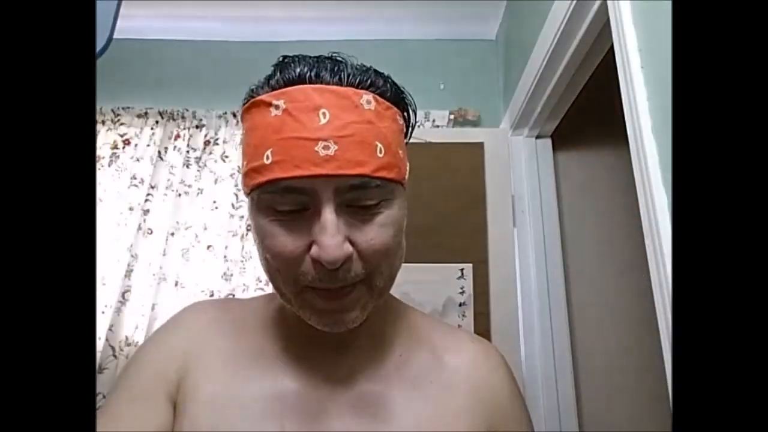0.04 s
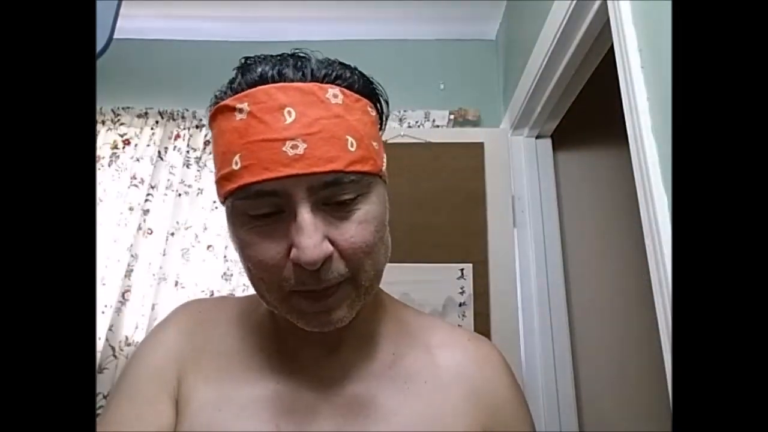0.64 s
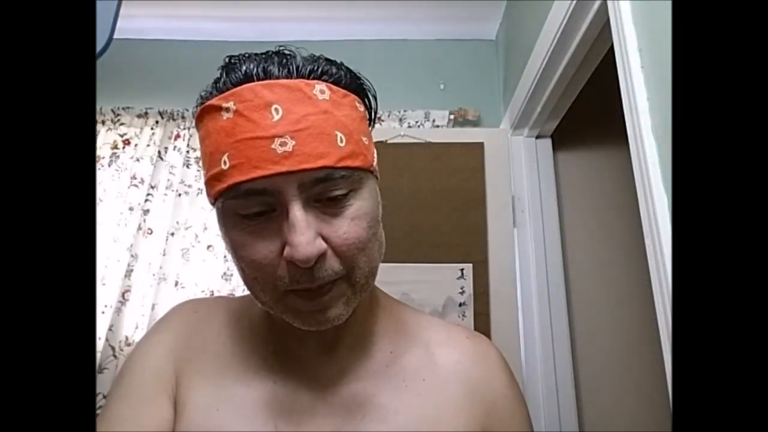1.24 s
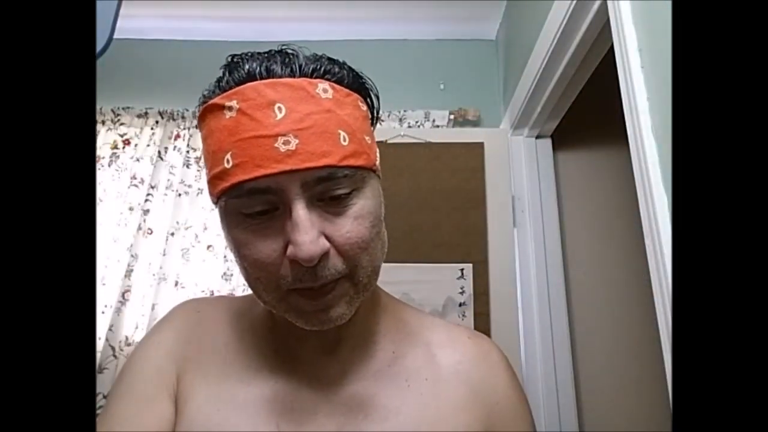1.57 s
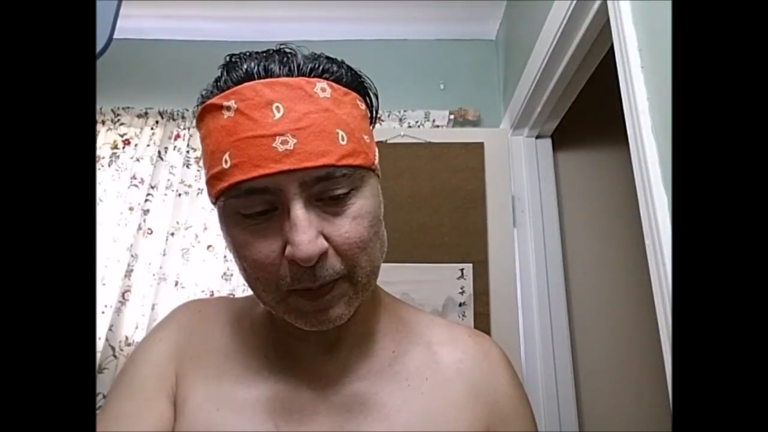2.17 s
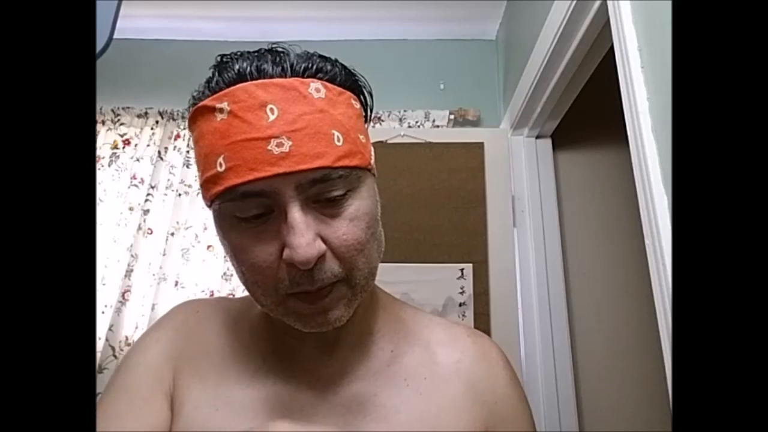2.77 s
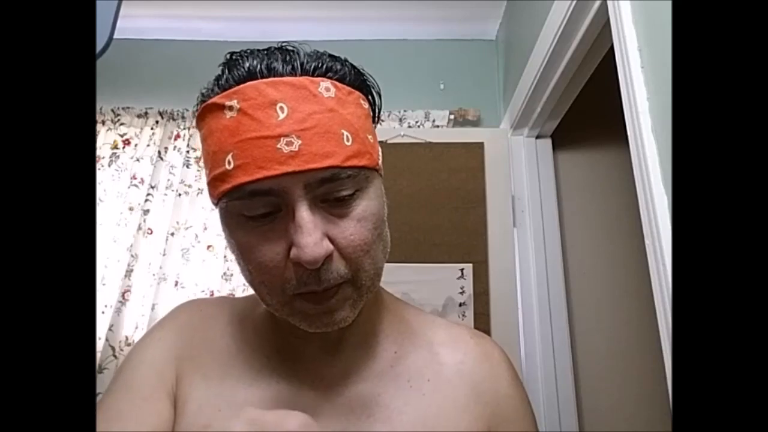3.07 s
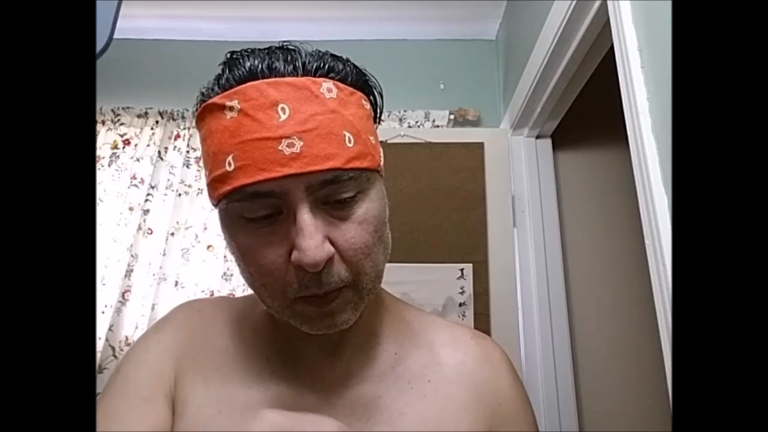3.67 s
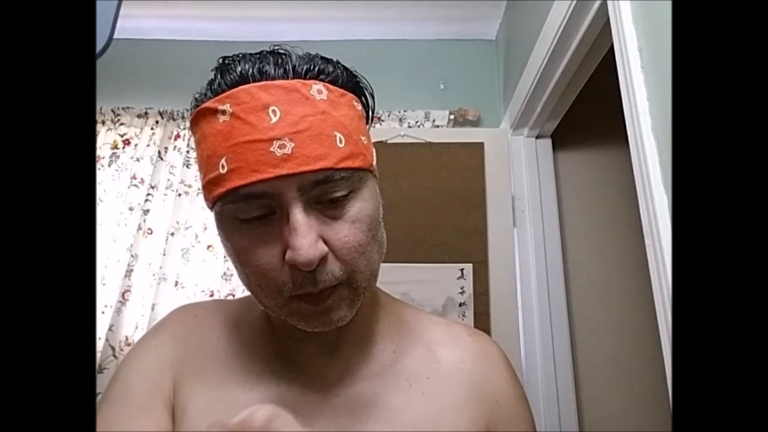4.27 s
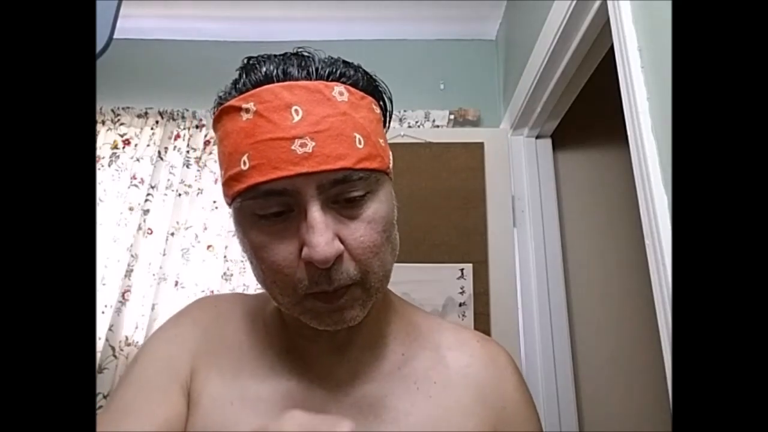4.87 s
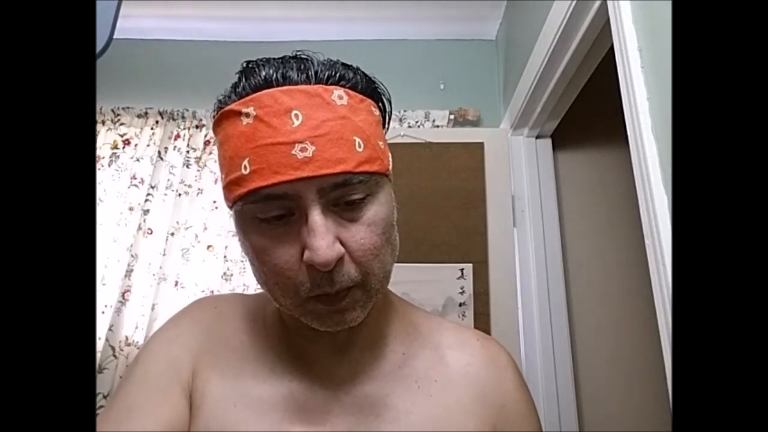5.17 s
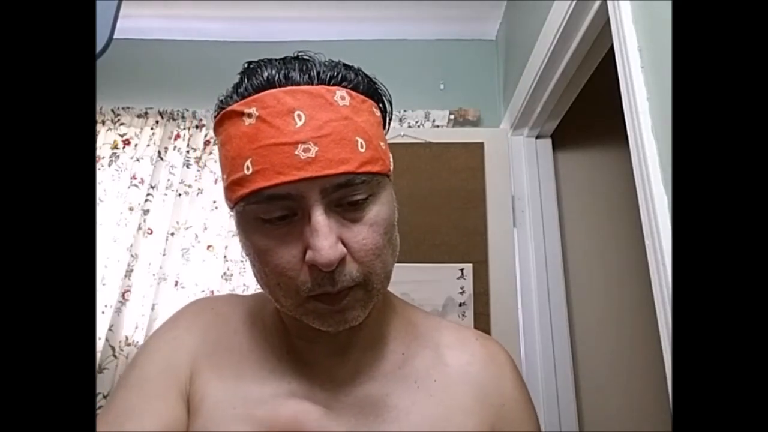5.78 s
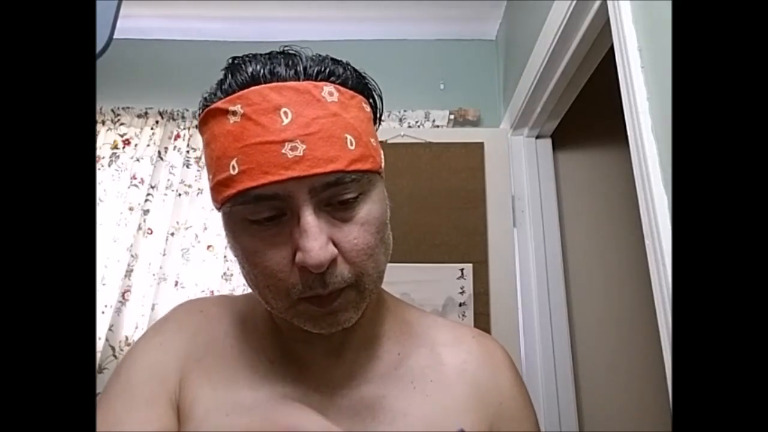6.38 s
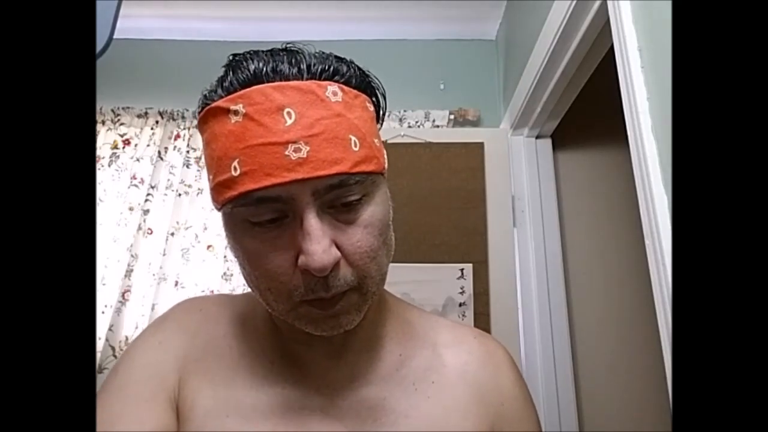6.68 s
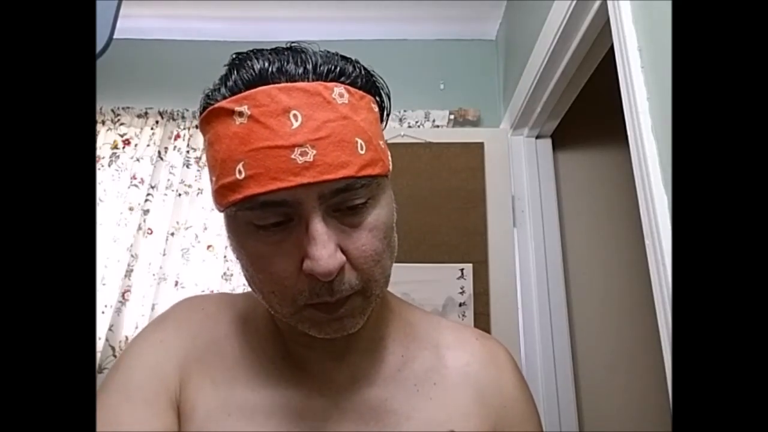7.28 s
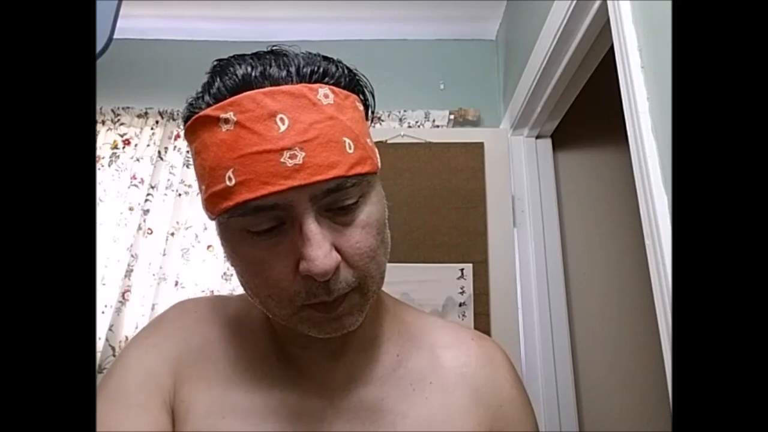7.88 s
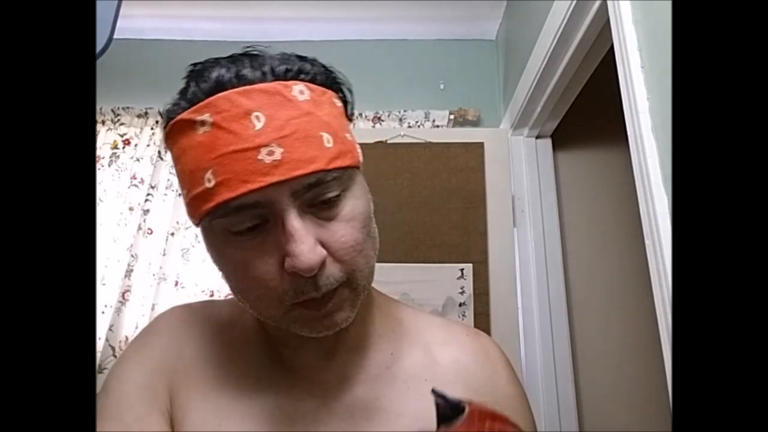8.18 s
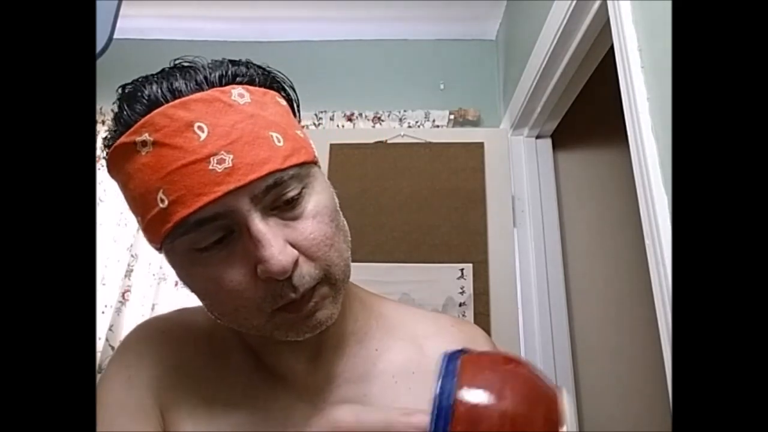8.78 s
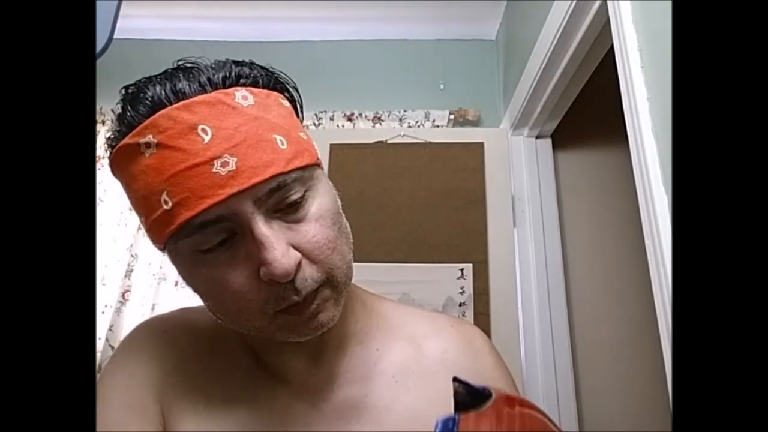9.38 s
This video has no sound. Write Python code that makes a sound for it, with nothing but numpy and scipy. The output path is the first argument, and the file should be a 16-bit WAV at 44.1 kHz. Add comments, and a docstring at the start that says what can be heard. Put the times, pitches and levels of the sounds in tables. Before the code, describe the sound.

Two sharp, bright clinks of a brush handle on a ceramic mug come at about 0.3 and 0.5 seconds, each ringing briefly. They are the loudest sounds. From about 0.7 to 3 seconds a shaving brush makes soft, irregular wet sweeps inside the mug, with faint foam fizz and a few small bubble pops. At around 3.2 seconds it settles into rhythmic whipping, about six turns a second, swishing and squelching, firmest between 6 and 8 seconds. After 8.2 seconds the strokes loosen into separate sweeps again. Another clear clink comes at about 8.8 seconds, followed by a faint tap, and the sweeps continue to around 9.4 seconds. A ventilation fan hums low and steady throughout. The mug and brush sound close, with the short reverberation of a tiled bathroom.

```python
"""Two bright clinks of a handle on a ceramic mug, then a shaving brush whipping lather in a tiled bathroom.
Friction of wet bristles on the wall makes a swish: loose sweeps, then about six turns a second, then
sweeps again. Foam fizzes, and bursting air pockets ring as short bubble notes. Each impact of the handle
excites the mug's modes, clearly once more near the end. A ventilation fan hums steadily behind it all."""
import sys
import numpy as np
from scipy import signal
from scipy.fft import rfft, irfft, next_fast_len
from scipy.io import wavfile
from scipy.ndimage import map_coordinates

SR = 44100
rng = np.random.default_rng(int(sys.argv[2]) if len(sys.argv) > 2 else 0)


def file_out(sig):
    """Save sig as 16-bit WAV at sys.argv[1]."""
    # one column per channel
    cols = np.atleast_2d(sig).T
    # limit, then scale
    lim = np.clip(cols, -1, 1)
    pcm = np.round(lim * 32767).astype(np.int16)
    wavfile.write(sys.argv[1], SR, pcm)


N = 415863

# normal modes of the mug: pitch_hz, relative_db, base_t60_s, left_right_db, left_right_phase_rad
MUG_MODES = [(1028, -27, .1, -2, 3), (1206, -16, .1, -6, -2.6), (1350, 0, .16, -1, 2.7),
             (1611, -8, .31, 1, .7), (1921, -26, .07, -3, -.9), (2153, -25, .07, 7, .6),
             (2388, -23, .07, 9, -1.7), (2865, -13, .05, 7, -2.5), (2900, -14, .14, 6, -1.7),
             (3270, -11, .1, -3, 2.3), (4400, -29, .08, 1, 2.6), (4940, -15, .06, -5, -1.2),
             (4968, -15, .2, -2, .2), (5870, -25, .05, 8, 2.6), (6050, -25, .1, 7, -1),
             (6790, -30, .09, -3, -2.1), (7930, -33, .09, 1, .5), (9060, -32, .07, 0, 2.2),
             (10785, -38, .07, 3, 2), (11400, -38, .07, 1, .8)]


def brush():
    """Friction noise: bristles swish on the wall and push lather ahead; overlapping strokes add in power."""
    # spectra of rubbing bristles, squeezed lather and fizzing foam: frequency_hz, relative_db
    bristle_spectrum = [(400, -35), (900, -4.5), (1250, -6), (1650, -4.5), (2400, 0), (3600, -0.5),
                        (5000, -5), (6300, -3.5), (8500, -12), (15500, -12.5)]
    squelch_spectrum = [(250, -32), (480, -6), (750, -2), (1150, 2.5), (1600, -21), (3000, -20)]
    foam_spectrum = [(240, -37.5), (400, -10.5), (957, -5.5), (1070, -6), (1510, -13.5), (3210, -13.5),
                     (3620, -14.5), (6380, -18.5), (15500, -30.5)]
    # fizz of the foam round the brush: time_s, level_db
    fizz_levels = [(0.1, -66), (0.6, -58), (1.2, -63.5), (2.3, -58), (3.1, -67), (5.2, -66), (7.1, -62.5),
                   (7.9, -60.5), (8.35, -65), (8.85, -57.5), (9.43, -60)]
    t = np.arange(N) / SR
    lag = np.arange(-(SR // 10), SR // 10) / SR  # seconds from the middle of a stroke
    swish_power, squelch_power = np.zeros((1, N)), np.zeros((1, N))
    for s, swish_db, half_s, squelch_db in brush_strokes():
        contact = (1 + np.tanh((lag + 0.95 * half_s) / .002)) / 2  # the bristles land abruptly
        rub = np.exp(-(lag / (0.81 * half_s)) ** 2) * (contact + 0.028)
        squeeze = np.exp(-(lag / (.7 * half_s)) ** 2)
        add(swish_power, s + lag[0] - .003, amp(swish_db) ** 2 * rub)
        add(squelch_power, s + lag[0] - .008, amp(squelch_db) ** 2 * squeeze)
    swish = amp(0.5) * np.sqrt(swish_power) * thickened(froth(bristle_spectrum, grain_db=2.0))
    squelch = amp(-2.5) * np.sqrt(squelch_power) * froth(squelch_spectrum, grain_db=5.5)
    fizz_db = np.interp(t, *np.transpose(fizz_levels)) - 0.5 + 2.1 * wobble(20)
    fizz = amp(fizz_db) * froth(foam_spectrum, grain_db=3)
    return room(swish + squelch + fizz, wet_db=-6.0)


def brush_strokes():
    """Intermittent contact: each touch of the wall as (middle_s, swish_db, half_length_s, squelch_db)."""
    # the back swing touches the wall more as the circles widen: time_s, db_over_forward_stroke
    back_contact = [(3.2, -7.5), (4.6, -14.5), (5.6, -10.5), (6.55, -14), (7.1, -5.5), (7.65, -8.5),
                    (8.1, -11)]
    # single slow sweeps before and after the whipping: middle_s, swish_db
    slow_sweeps = [(.143, -58), (.708, -51), (.921, -54), (1.039, -52.5), (1.175, -57), (1.288, -54.5),
                   (1.425, -55.5), (1.694, -52), (1.814, -60), (2.047, -52.5), (2.261, -51.5),
                   (2.39, -59.5), (2.486, -54.5), (2.845, -62.5), (2.966, -57.5), (8.447, -57.5),
                   (8.65, -54.5), (8.761, -56), (9.021, -53.5), (9.175, -51.5), (9.268, -55.5),
                   (9.351, -52.5)]
    times, levels = whipping()
    back_times = times[:-1] + 0.55 * np.diff(times)  # just past half of each cycle
    back_levels = levels[:-1] + np.interp(back_times, *np.transpose(back_contact))
    whips = [(s, db, .019, db - 4) for s, db in zip(times, levels)]
    back_swings = [(s, db, .024, db - 1.5) for s, db in zip(back_times, back_levels)]
    sweeps = [(s, db, .026, db - 2) for s, db in slow_sweeps]
    return whips + back_swings + sweeps


def whipping():
    """Quasi-periodic drive: times and levels of forward strokes, faster and firmer as the lather builds."""
    # marks between which the strokes are evenly paced: time_s, strokes_done
    pace = [(3.196, 0), (3.388, 1), (4.387, 7), (4.915, 10), (5.569, 14), (6.624, 21), (7.611, 28),
            (8.226, 32)]
    # force of the whipping: time_s, swish_db
    effort = [(3.2, -59), (3.39, -57), (3.6, -59.5), (4.06, -60.5), (4.5, -53.5), (5.2, -59), (5.42, -55),
              (6.03, -49.5), (7.2, -47.5), (8.07, -49.5), (8.23, -57)]
    mark_times, strokes_done = np.transpose(pace)
    times = np.interp(np.arange(strokes_done[-1] + 1), strokes_done, mark_times)
    return times, np.interp(times, *np.transpose(effort))


def froth(spectrum, grain_db):
    """Fast random amplitude modulation breaks noise into the tiny pops of bristles and bubbles."""
    return coloured(diffuse_noise(N) * amp(grain_db * wobble(900)), spectrum)


def thickened(swish, start_s=5.5, end_s=6.8, corner_hz=7000, shelf_db=-2):
    """Absorption: as the lather thickens it takes the top off the swish."""
    thickness = np.interp(np.arange(N) / SR, [start_s, end_s], [0, 1])
    treble = filtered(swish, lambda hz: 1 - 1 / (1 + (hz / corner_hz) ** 4))
    return swish + (amp(shelf_db * thickness) - 1) * treble


def clinks():
    """Impact of hard handle on glaze: a crack, a tick of the handle and the free vibration of the mug."""
    # strikes on the mug: start_s, low_modes_db, rim_mode_db, overtones_db, crack_db, ring_length_factor,
    # tick_db, bite_db
    strikes = [(.191, -62, -53, -57, -57, 0.91, -78, 0), (.2520, -11.5, -16.5, -15, -17, 0.89, -41, 3),
               (.4820, -11.5, -12, -16.5, -17.5, 0.64, -29, 3.5),
               (.925, -65, -48.5, -56, -61, 0.92, -69.5, 0), (1.202, -65, -46, -57.5, -54.5, 0.86, -57, -2),
               (8.8490, -19, -17, -22, -19.5, 0.79, -34, -3.5),
               (9.0997, -46, -43, -50, -45.5, 0.55, -50, -3)]
    out, t = np.zeros((2, N)), np.arange(SR * 3 // 4) / SR
    for s, low_db, rim_db, high_db, crack_db, length_factor, tick_db, bite_db in strikes:
        crack = amp(crack_db - 2.5) * amp([[.5], [-.5]]) * contact_crack(t, bite_db)
        handle_mode = np.tile(np.sin(2 * np.pi * 5900 * t) * decay(t, 0.0046), (2, 1))
        tick = amp(tick_db) * amp([[-6], [-14]]) * equal_energy(room(handle_mode, wet_db=-14.0))
        ring = amp(-3.0) * mug_ring(t, low_db, rim_db, high_db, length_factor)
        add(out, s, ring + crack + tick)
    return out


def mug_ring(t, low_db, rim_db, high_db, length_factor):
    """Modal superposition: the contact point sets the balance of the modes and the grip their damping."""
    ring, sides = np.zeros((2, len(t))), np.array([[.5], [-.5]])
    balance = [(1400, low_db), (1550, rim_db), (1680, rim_db), (1850, high_db)]  # frequency_hz, gain_db
    for hz, db, t60, pan_db, phase in MUG_MODES:
        mode = np.exp(2j * np.pi * (hz * t + rng.random())) * decay(t, t60 * length_factor)
        mode *= 1 - np.exp(-t * hz / 7)  # each mode swells over its first cycles
        stereo = room(mode[None], wet_db=0.0)
        stereo = stereo + stereo[::-1] / (1 + (hz / 1600) ** 2)  # long waves reach both sides alike
        pressure = (stereo * np.exp(1j * sides * phase)).imag
        ring += amp(db + along(balance, hz) + sides * pan_db) * equal_energy(pressure)
    return ring


def contact_crack(t, bite_db):
    """Scattering: a broadband snap spreads between sink and walls and leaves a duller tail."""
    # spectrum of the impact: frequency_hz, relative_db
    crack_spectrum = [(120, -29.5), (240, -5), (450, -4.5), (750, -9), (1250, 2), (1900, -1.5),
                      (2800, -5.5), (3700, -6), (4600, -15.5), (5600, -7), (7500, -21), (11000, -27),
                      (16000, -27)]
    noise = coloured(diffuse_noise(len(t)), crack_spectrum)
    bright = filtered(noise, lambda hz: mug_response(hz) * bite(hz, bite_db))
    dull = filtered(bright, lambda hz: 1 / np.sqrt(1 + (hz / 5000) ** 4))  # the walls absorb the top
    snap = np.exp(-(t / .0035) ** 2)
    early = bright * (snap + amp(-5) * decay(t, 0.17))
    late = dull * amp(-15) * decay(t, 0.47)
    return equal_energy(early + late)


def mug_response(hz):
    """Resonance: a hump around each of the mug's modes colours even the first crack."""
    return .5 + sum(1 / (1 + ((hz - mode_hz) / (.018 * mode_hz)) ** 2) for mode_hz, *_ in MUG_MODES)


def bite(hz, bite_db, edge_hz=4440, half_width_octaves=.55, body_hz=850):
    """Contact stiffness: a hard touch gives a sharp, thin crack, a cushioned one a dull, full crack."""
    edge = np.exp(-(np.log2((hz + 1) / edge_hz) / half_width_octaves) ** 2)
    body = 1 / (1 + (hz / body_hz) ** 4)
    return amp(bite_db * (edge - .75 * body))


def pops():
    """Bubble resonance: air breaking out of the foam gives a damped, rising note with a wet smack."""
    # large air pockets bursting in the lather: start_s, level_db, pitch_hz
    large_pops = [(0.94, -40.5, 640), (1.278, -45, 920), (1.866, -49, 676), (2.01, -45, 920),
                  (2.219, -47.5, 765), (2.957, -48, 1130), (4.132, -48, 834), (4.929, -45, 783),
                  (6.307, -46.5, 649), (6.458, -42, 947), (6.833, -48, 733), (7.115, -44, 654),
                  (7.259, -47, 1030), (7.995, -50, 800), (8.623, -49.5, 982)]
    # spectrum of the wet smack: frequency_hz, relative_db
    smack_spectrum = [(350, -22), (700, 2), (1200, -5.5), (2800, -14), (4000, -14), (12000, -27.5)]
    out, t = np.zeros((1, N)), np.arange(SR // 20) / SR
    for s, db, hz in large_pops + stroke_pops():
        bubble = np.sin(2 * np.pi * hz * (t + 8 * t ** 2)) * decay(t, 0.031)
        smack = .7 * coloured(rng.standard_normal(len(t)), smack_spectrum) * decay(t, 0.033)
        attack = 1 - np.exp(-t / 0.0009)
        add(out, s, amp(db) * (bubble + smack) * attack)
    return room(out, wet_db=-4.5)


def stroke_pops(chance=.62, lead_s=.018, median_hz=1028, log_spread=.18):
    """Rupture: some strokes burst a bubble on landing, louder if firmer: (start_s, level_db, pitch_hz)."""
    times, levels = whipping()
    bursts = rng.random(len(times)) < chance
    pitches = median_hz * np.exp(log_spread * rng.standard_normal(len(times)))
    return list(np.transpose([times - lead_s, levels - 1, pitches])[bursts])


def fan():
    """Broadband and tonal fan noise: duct rumble, a faint rush of air and slightly unsteady motor tones."""
    # spectra of the duct and of the moving air: frequency_hz, relative_db
    rumble_spectrum = [(12, -49), (20, -21.5), (22, -29), (32, -29.5), (40, -17), (53, -4.5), (113, 2),
                       (177, -4), (193, -8.5), (262, -5.5), (276, -10.5), (287, -39.5), (326, -7.5),
                       (360, -28.5), (420, -33.5), (550, -59.5), (920, -120)]
    rush_spectrum = [(190, -29.5), (330, 3), (388, -10), (750, -11.5), (826, -24), (1090, -35.5),
                     (1300, -25.5), (1730, -31.5), (2000, -16), (2810, -27), (15500, -31)]
    # motor tones: pitch_hz, level_db
    motor_tones = [(107.7, -59), (220.7, -64.5), (258.4, -58.5), (328.4, -69.5), (516.8, -76.5),
                   (818.3, -77.5)]
    t = np.arange(N) / SR
    rumble = amp(-51.5) * coloured(diffuse_noise(N), rumble_spectrum)
    rush = amp(-62.5) * coloured(diffuse_noise(N), rush_spectrum)
    hum = np.zeros(N)
    for hz, db in motor_tones:
        peak = np.sqrt(2) * amp(db + 0.5 + 1.5 * wobble(2.9))
        hum += peak * np.sin(2 * np.pi * hz * t + .5 * wobble(6.6))
    return (rumble + hum) * amp([[.9], [-.9]]) + rush


def room(x, wet_db):
    """Reverberation: the tiled walls add a diffuse tail to x that lasts longest in the bass."""
    # reverberation time of the tiled room: frequency_hz, t60_s
    reverb_times = [(200, 0.46), (1400, 0.35), (5000, 0.3), (8000, 0.29), (12000, 0.3)]
    hz, t, bands = signal.stft(diffuse_noise(SR // 2), SR, nperseg=256)
    tail = signal.istft(bands * decay(t, along(reverb_times, hz)[:, None]), SR, nperseg=256)[1]
    tail *= 1 - np.exp(-np.arange(tail.shape[1]) / SR / 0.0016)  # the reflections build up
    reflections = signal.fftconvolve(x, tail / np.linalg.norm(tail[0]), axes=1)
    return x + amp(wet_db) * reflections[:, :x.shape[1]]


def diffuse_noise(size):
    """Spatial coherence: noise in a diffuse field is alike at two nearby points only in the bass."""
    # likeness of left and right: frequency_hz, coherence
    coherence = [(60, 1), (130, 0.94), (260, 0.49), (500, 0.69), (1100, -.2), (2500, -0.16),
                 (12000, -0.0085)]

    def mid_side_gains(hz):
        angle = np.arccos(np.clip(along(coherence, hz), -1, 1)) / 2
        return np.array([np.cos(angle), np.sin(angle)])

    mid, side = filtered(rng.standard_normal((2, size)), mid_side_gains)
    return np.array([mid + side, mid - side])


def amp(db):
    """Decibels as an amplitude ratio."""
    return 10 ** (np.asarray(db) / 20)


def decay(t, t60_s):
    """Exponential damping, 60 dB in t60_s."""
    return amp(-60 * t / t60_s)


def unit_rms(x):
    """Each channel at rms 1."""
    return x / np.sqrt(np.mean(x ** 2, axis=-1, keepdims=True) + 1e-20)


def equal_energy(x):
    """Each channel with the energy of 50 ms at rms 1."""
    return unit_rms(x) * np.sqrt(SR / 20 / x.shape[-1])


def along(points, hz):
    """Interpolation of (frequency_hz, value) points on a log frequency axis."""
    frequencies, values = np.transpose(points)
    return np.interp(np.log(hz + 1), np.log(frequencies + 1), values)


def wobble(rate):
    """A smooth random curve, rate knots a second."""
    knots = rng.standard_normal(int(N * rate / SR) + 4)
    return map_coordinates(knots, [np.arange(N) * rate / SR])


def filtered(x, response):
    """Linear filtering: the spectrum of x times response(hz)."""
    size = x.shape[-1]
    padded = next_fast_len(size + 8192)
    return irfft(rfft(x, padded) * response(np.fft.rfftfreq(padded, 1 / SR)), padded)[..., :size]


def coloured(x, spectrum):
    """x shaped by a spectrum, at rms 1."""
    return unit_rms(filtered(x, lambda hz: amp(along(spectrum, hz))))


def add(track, start_s, x):
    """Superposition: mix x into the track from start_s."""
    part = track[:, max(0, round(start_s * SR)):][:, :x.shape[-1]]
    part += x[..., :part.shape[-1]]


def scene():
    """Sound pressures add: mug, brush and lather close by, the fan behind them."""
    return clinks() + brush() + pops() + fan()


def record(dry, top_hz=15850):
    """Band limiting: nothing above top_hz is heard."""
    return filtered(dry, lambda hz: hz < top_hz)


dry = scene()
out = record(dry)
file_out(out)
```